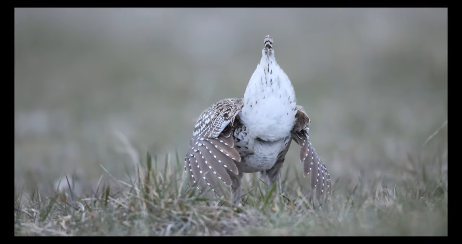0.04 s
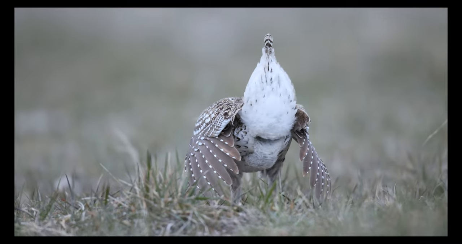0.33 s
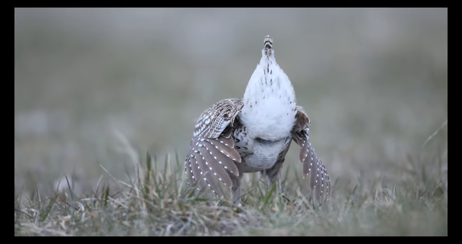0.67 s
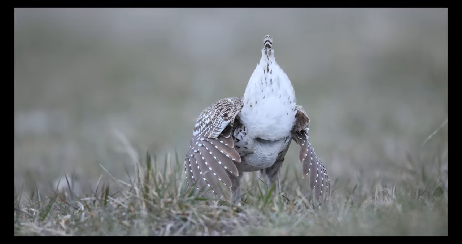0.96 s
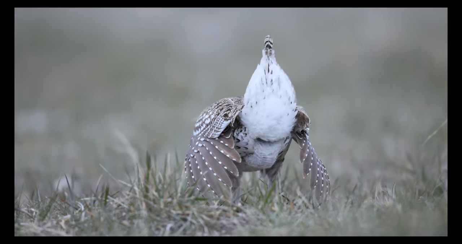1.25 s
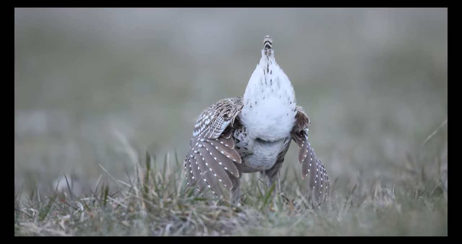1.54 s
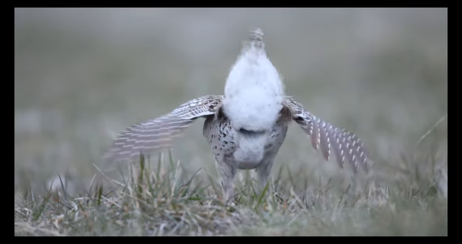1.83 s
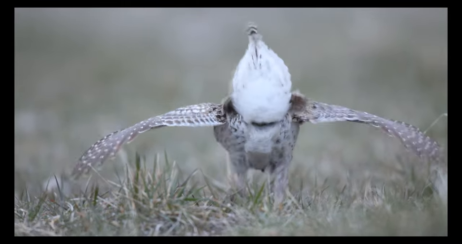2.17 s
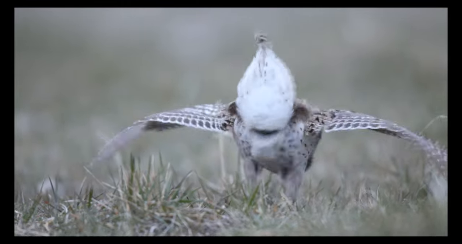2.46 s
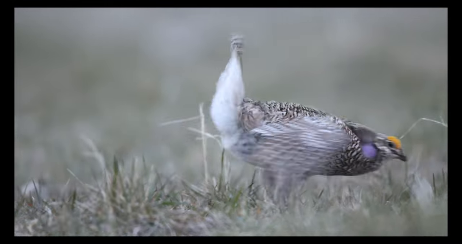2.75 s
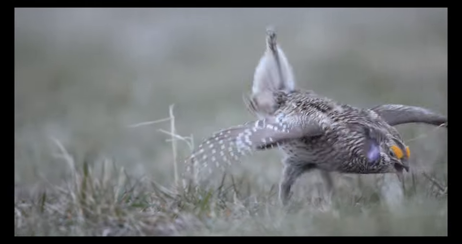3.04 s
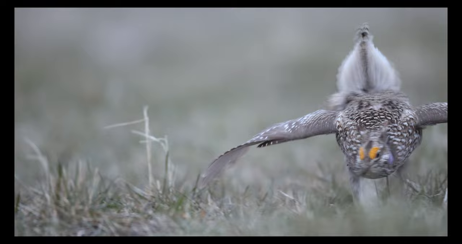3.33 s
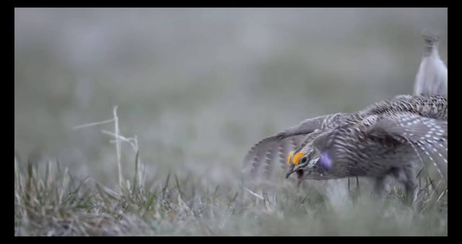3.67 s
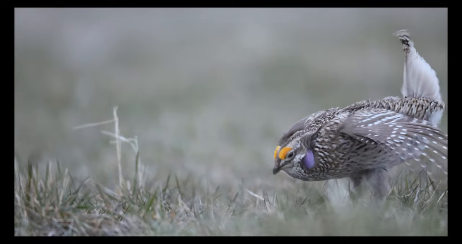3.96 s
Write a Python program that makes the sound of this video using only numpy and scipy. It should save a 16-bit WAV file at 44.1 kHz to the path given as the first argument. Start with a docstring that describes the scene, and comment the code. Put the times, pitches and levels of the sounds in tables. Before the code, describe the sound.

A grouse stamps its feet in a rapid drumming roll, with rattling tail clicks and squeaks.

```python
"""A grouse dancing on short grass

Close by, a grouse stamps about twenty times a second. Each stamp is a knock and a dull thump in the turf.
At full dance its tail swishes and the quills click with the steps. Stiff feathers snap in between,
the grouse pop their neck sacs and squeak, others patter nearby and small birds whistle far off."""
import sys
import numpy as np
from scipy import signal
from scipy.fft import rfft, irfft
from scipy.io import wavfile

SR = 44100
rng = np.random.default_rng(int(sys.argv[2]) if len(sys.argv) > 2 else 0)


def output_pcm(signal):
    """Save a mono or channel-first signal as 16-bit PCM at the path in sys.argv[1].

    Samples are clipped to [-1, 1] before scaling.
    """
    pcm = np.clip(np.atleast_2d(signal).T, -1, 1) * 32767
    wavfile.write(sys.argv[1], SR, np.round(pcm).astype(np.int16))


N = 176400
TIME = np.arange(N) / SR
BRIEF = np.arange(int(.06 * SR)) / SR   # the clock for one short sound, in seconds

# Levels in the tables are relative: the functions may turn a whole layer up or down.
# The tone of still morning air. Each row: frequency in Hz, level in dB.
AIR_TONE = [(25, -12), (90, 3), (177, -3), (432, -7.5), (700, -13), (1230, -16), (15500, -25.5)]
# The part of the air that differs between the ears. Each row: frequency in Hz, level in dB.
SIDE_AIR_TONE = [(25, 11), (900, -23), (16000, -20.5)]
# Far songbirds. Each row: start and length in seconds, first, middle and last pitch in Hz, level in dB.
WHISTLES = [(0.683, 0.25, 4240, 3810, 3340, -61), (0.814, 0.21, 2774, 2744, 2714, -60),
            (1.162, .17, 3330, 3150, 3160, -61.5), (1.253, 0.088, 2350, 2244, 2210, -52),
            (1.639, 0.096, 2188, 2228, 2196, -46.5), (1.799, 0.051, 2533, 2555, 2620, -49.5),
            (3.175, 0.094, 3620, 3640, 3640, -46), (3.384, 0.23, 2020, 2020, 1980, -48.5)]
# The other grouse moving about. Each row: time in seconds, then patter, scuff and rustle levels in dB.
BUSTLE_LEVELS = [(0, -46, -49.5, -65), (.4, -53, -72.5, -75), (.6, -67, -89, -97), (1.15, -78, -72, -84),
                 (1.48, -56, -58.5, -67), (1.6, -39.5, -57, -64.5), (1.76, -40, -63, -64),
                 (1.95, -38, -50.5, -56.5), (2.12, -37.5, -40.5, -50.5), (2.43, -27, -37.5, -47.5),
                 (3.02, -30.5, -35.5, -47.5), (3.6, -29.5, -44, -47.5), (4, -38.5, -33.5, -52.5)]
# The tone of scuffed grass. Each row: frequency in Hz, level in dB.
SCUFF_TONE = [(52, -47), (82, 7), (130, 2.5), (350, 7.5), (550, 1.5), (780, -5), (1050, -19), (1600, -20.5)]
# The tone of rustling feathers. Each row: frequency in Hz, level in dB.
RUSTLE_TONE = [(1600, -12), (2300, 3.5), (3600, 4.5), (4600, 0), (7000, -4.5), (10000, -10), (16000, -16.5)]
# Hollow pops from the neck sacs. Each row: start in seconds, level in dB.
POPS = [(2.486, -20), (2.957, -20.5), (3.491, -20.5), (3.757, -36.5), (3.797, -37.5)]
# Squeaks and yelps. Each row: start and length in seconds, first, middle and last pitch in Hz,
# level in dB, rough drop from one overtone to the next in dB.
SQUEAKS = [(-.012, 0.022, 1011, 846, 644, -27.5, 10.5), (0, 0.087, 1910, 2167, 1500, -36, 24),
           (0.007, 0.073, 638, 431.4, 410, -39.5, 7.5), (1.982, 0.035, 2500, 2744, 2470, -40, 14),
           (1.974, 0.053, 2000, 2140, 2120, -44.5, 30), (2.049, 0.012, 820, 1074, 1300, -30.5, 9.5),
           (2.059, 0.017, 1980, 2173, 2220, -20, 29), (2.067, 0.023, 2810, 2800, 2350, -22.5, 21.5),
           (2.09, 0.0186, 1680, 1360, 1190, -30, 23), (2.367, 0.065, 2380, 1370, 1120, -51, 12),
           (2.382, 0.065, 3400, 3160, 2970, -45, 6), (2.557, 0.036, 2800, 2680, 2460, -42.5, 5),
           (1.442, 0.031, 2850, 2350, 1650, -55.5, 30), (2.014, .032, 1910, 1247, 990, -46, 16),
           (3.749, 0.04, 3210, 3220, 3080, -39, 4), (3.79, 0.042, 3120, 2780, 2630, -37.5, 31),
           (3.834, 0.017, 694, 1306, 1900, -29.5, 16), (3.848, 0.035, 2620, 2888, 2600, -19.5, 7),
           (3.884, .032, 1305, 1216, 940, -25, 23), (3.894, 0.029, 2590, 2630, 2500, -42, 4),
           (3.968, 0.03, 2910, 3160, 2850, -40.5, 7)]
# Stiff feathers snapping; the first three rows, on the opening steps, are the high ring of the quills as the
# tail clicks. Each row: time in seconds, level in dB, pitch in Hz.
SNAPS = [(0.111, -49, 5250), (0.217, -49.5, 5100), (0.323, -50, 5200), (2.392, -27, 7500),
         (2.4038, -18.5, 3610), (2.47, -20, 3220), (2.469, -29, 7480), (2.878, -25, 3520),
         (2.943, -27.5, 3375), (2.943, -30, 7730), (3.073, -33, 6670), (3.395, -27, 7810),
         (3.409, -34.5, 3840), (3.473, -28, 7900), (3.475, -31.5, 3585), (3.702, -32.5, 6520),
         (3.781, -34, 6230)]
# How hard the bird dances. Each row: time in seconds, level in dB.
VIGOUR = [(0, -21), (.35, -23), (.5, -41), (1.3, -30.5), (1.85, -34), (2.09, -11.5), (2.19, 0.5),
          (2.35, -5.5), (3.65, -3), (3.8, 1.5), (4, -16.5)]
# The tone of the tail's swish. Each row: frequency in Hz, level in dB.
SWISH_TONE = [(1500, -30), (2300, -1.5), (3600, 3), (4400, -1), (8500, -1), (11000, -6), (16000, -17)]
# The dancer's steps. Each row: time in seconds, thump level in dB, tail click level in dB.
STAMPS = [(0.058, -30.5, -58), (0.11, -28.5, -49.5), (0.164, -32, -75), (0.216, -33, -52),
          (0.266, -30.5, -69), (0.322, -31.5, -53.0), (0.364, -35, -62.8), (0.417, -36, -72.8),
          (1.226, -40.5, -67), (1.275, -40, -75), (1.323, -38.5, -69), (1.378, -42.5, -83),
          (1.428, -39.5, -57), (1.478, -38.5, -57), (1.53, -34, -57), (1.598, -31, -62), (1.652, -32, -61),
          (1.742, -27.5, -58), (1.818, -34, -55), (1.9, -26, -45), (1.949, -25, -49), (2, -26.5, -45),
          (2.048, -24.5, -41), (2.097, -19, -36), (2.144, -18, -24), (2.195, -17, -24.5),
          (2.244, -16.5, -22.5), (2.293, -16, -25), (2.343, -15, -21), (2.378, -18.0, -33.5),
          (2.416, -19, -55), (2.45, -18, -51), (2.514, -16, -28), (2.564, -16, -29.5),
          (2.615, -18.5, -23.5), (2.664, -15.5, -29.5), (2.716, -18, -27), (2.766, -16.5, -29.5),
          (2.815, -18, -29.5), (2.852, -16, -36), (2.886, -21.5, -60.7), (2.92, -17.7, -55),
          (2.987, -16.5, -39), (3.039, -16.5, -27.5), (3.09, -18, -31.5), (3.142, -15, -28),
          (3.192, -18.5, -30), (3.244, -18.5, -26), (3.297, -19, -29.5), (3.346, -15.5, -26),
          (3.382, -19, -37), (3.417, -22.5, -51), (3.45, -20, -46), (3.516, -20.5, -37), (3.57, -19, -32.5),
          (3.622, -18.7, -29.5), (3.671, -21, -31.5), (3.725, -20.5, -33), (3.926, -20.5, -41),
          (3.991, -24, -41)]


def from_db(db):
    """Turn decibels into a number to multiply a sound by."""
    return 10 ** (np.asarray(db) / 20)


def rms_one(x):
    """Scale a sound so that its average power is 1."""
    return x / np.sqrt(np.mean(x ** 2) + 1e-20)


def gains(rows):
    """Turn each dB column of a table into a volume for every sample."""
    times, *columns = np.transpose(rows)
    return [from_db(np.interp(TIME, times, column)) for column in columns]


def add(out, start_s, sound):
    """Mix a sound in at a given time, dropping what does not fit."""
    i = int(round(start_s * SR))
    part = sound[max(-i, 0):max(N - i, 0)]
    out[max(i, 0):max(i, 0) + len(part)] += part


def noise(tone):
    """Steady noise shaped by a tone table."""
    hz, db = np.transpose(tone)
    all_hz = np.arange(N // 2 + 1) * SR / N
    curve_db = np.interp(np.log(all_hz + 1), np.log(hz), db, left=-60, right=-60)
    return rms_one(irfft(rfft(rng.standard_normal(N)) * from_db(curve_db), N))


def wander(t, rate_hz):
    """A random wobble, mostly between -1 and 1."""
    return np.interp(t * rate_hz, np.arange(4096), rng.standard_normal(4096))


def phase_of(hz):
    """The angle a wave has turned through as it follows a changing pitch."""
    return 2 * np.pi * np.cumsum(hz) / SR


def bump(t, width_s):
    """A smooth hill that peaks where t is zero."""
    return np.exp(-.5 * (t / width_s) ** 2)


def swell(rise_s, shape):
    """A volume that rises, then dies away; a larger shape makes it shorter."""
    u = BRIEF / rise_s
    return (u * np.exp(1 - u)) ** shape


def thud(hz, rise_s, shape):
    """A few swings of a tone that quickly dies away."""
    return swell(rise_s, shape) * np.sin(2 * np.pi * hz * BRIEF)


def grit(low_hz, high_hz):
    """A short piece of bright rubbing noise."""
    hiss = rng.standard_normal(len(BRIEF))
    bright = signal.sosfilt(signal.butter(2, low_hz, "high", fs=SR, output="sos"), hiss)
    return rms_one(signal.sosfilt(signal.butter(2, high_hz, fs=SR, output="sos"), bright))


def note(length_s, pitches, rough, shape, drop_db=0, harmonics=1):
    """A bird note that curves through three pitches, with overtones if asked for."""
    t = np.arange(int(length_s * SR)) / SR
    progress = t / length_s
    hz = np.polyval(np.polyfit([0, .5, 1], pitches, 2), progress)
    phase = phase_of(hz * (1 + rough * wander(t, 857)))
    wave = sum(from_db(-drop_db * k - k * (k - 1.5)) * np.sin((k + 1) * phase) for k in range(harmonics))
    return np.sin(np.pi * progress) ** shape * wave


def vigour_db(s):
    """How hard the bird is dancing at a given second."""
    return np.interp(s, *np.transpose(VIGOUR))


def air():
    """Faint morning air: the part both ears share, and the part that differs."""
    side = from_db(-67.5) * noise(SIDE_AIR_TONE)
    return from_db(-60) * noise(AIR_TONE), side


def meadow_echo(calls, echo_db=-25.5, fade_s=0.17):
    """The meadow scatters a little sound back, leaving a faint echo behind each call."""
    t = TIME[:SR // 2]
    scatter = rng.standard_normal(len(t)) * from_db(-60 * t / fade_s)
    echo = signal.fftconvolve(calls, scatter / np.linalg.norm(scatter))[:N]
    return calls + from_db(echo_db) * echo


def songbirds(trill_start_s=1.402, trill_step_s=.079, trill_hz=(4700, 4050, 3550)):
    """Small far birds sing pure whistles and a thin trill of seven falling notes."""
    out = np.zeros(N)
    for s, length_s, *pitches, db in WHISTLES:
        add(out, s, from_db(db) * note(length_s, pitches, rough=0.0065, shape=0.37))
    for k in range(7):
        falling = note(.052, trill_hz, rough=0.035, shape=1)
        add(out, trill_start_s + k * trill_step_s, from_db(-61) * falling)
    return out


def bustle(steps_per_s=110, low_hz=145.5, high_hz=277, range_db=8):
    """Other grouse patter about at random, scuffing the grass and rustling their feathers."""
    patter_gain, scuff_gain, rustle_gain = gains(BUSTLE_LEVELS)
    scuff = noise(SCUFF_TONE) * from_db(4.76 * wander(TIME, 90))
    rustle = noise(RUSTLE_TONE) * from_db(4 * wander(TIME, 601) + 2 * wander(TIME, 45))
    patter = np.zeros(N)
    for k, (delay, pitch, size) in enumerate(rng.random((int(steps_per_s * N / SR), 3))):
        step = thud(low_hz + (high_hz - low_hz) * pitch, rise_s=0.0048, shape=1.05)
        add(patter, (k + delay) / steps_per_s, from_db(range_db * size) * step)
    patter = from_db(-2.5) * patter_gain * rms_one(patter)
    return patter + scuff_gain * rms_one(scuff) + rustle_gain * rms_one(rustle)


def bustle_dips(lead_s=0.016, dip_db=-2):
    """A volume that makes the bustle a little quieter just before each stamp."""
    return from_db(dip_db * sum(bump(TIME - s + lead_s, width_s=0.0045) for s, *_ in STAMPS))


def pops(start_hz=325, ring_hz=844, glide_s=0.0085):
    """Each pop slides up to the pitch at which the neck sacs ring."""
    out = np.zeros(N)
    phase = phase_of(ring_hz + (start_hz - ring_hz) * np.exp(-BRIEF / glide_s))
    for s, db in POPS:
        add(out, s, from_db(db) * swell(rise_s=0.0083, shape=1.14) * np.sin(phase))
    return out


def squeaks(rasp_hz=28):
    """The grouse squeak and yelp, their voices breaking from one pitch range to another."""
    out = np.zeros(N)
    for s, length_s, *pitches, db, drop_db in SQUEAKS:
        squeak = note(length_s, pitches, rough=rasp_hz / pitches[1], shape=0.79, drop_db=drop_db, harmonics=5)
        add(out, s, from_db(db) * squeak)
    return out


def wings(start_s=1.735):
    """The opening wings push a soft, low puff of air."""
    out = np.zeros(N)
    add(out, start_s, from_db(-33.5) * thud(hz=121.3, rise_s=.013, shape=2.2))
    return out


def feather_snaps(width_s=0.00076, fade_s=0.0036):
    """A stiff feather lets go, or a quill rings high as the tail clicks: a tiny ping and a dry crackle."""
    out, middle = np.zeros(N), BRIEF.mean()
    for s, db, hz in SNAPS:
        phase = phase_of(hz * (1 + 0.076 * wander(BRIEF, 2453)))
        ping = np.sin(phase) * bump(BRIEF - middle, width_s)
        crackle = grit(2500, 10000) * np.exp(-BRIEF / fade_s)
        add(out, s - middle, from_db(db + 3) * ping)
        add(out, s - width_s, from_db(db - 9.5) * crackle)
    return out


def quill_clicks(base_hz=2892, width_s=.0013, pitch_split=.12, lag_s=.0006):
    """The quills of the tail's two halves catch in rough, rising chirps, a little apart in pitch and time."""
    out, middle = np.zeros(N), BRIEF.mean()
    t = BRIEF - middle
    rise = 0.27 * np.tanh(70 * t)
    for s, _, db in STAMPS:
        hz = base_hz * (1 + 0.013 * vigour_db(s) + 0.0408 * rng.standard_normal())   # lazy tails click lower
        for half in (-1, 1):
            phase = phase_of(hz * (1 + half * pitch_split + rise + 0.076 * wander(BRIEF, 1995)))
            chirp = np.sin(phase) + from_db(-10) * np.sin(2 * phase) + from_db(-14) * grit(3400, 5700)
            click = chirp / np.cosh(t / width_s)   # only the middle of the chirp is heard
            add(out, s - middle + half * lag_s, from_db(db - 2) * click)
    return out


def tail_swish(lead_s=0.0067):
    """The tail feathers slide past each other just before the quills click."""
    sweeps, middle = np.zeros(N), BRIEF.mean()
    for s, *_ in STAMPS:
        add(sweeps, s - lead_s - middle, bump(BRIEF - middle, width_s=0.005))
    level_db = -42 + vigour_db(TIME) + 1.7 * wander(TIME, 700)
    return from_db(level_db) * sweeps * noise(SWISH_TONE)


def feet(thump_hz=204, knock_hz=641, lead_s=0.00723, knock_rise_s=.002):
    """Each foot lands with a short knock, then the turf thumps. Harder dancing brings out the knock."""
    out = np.zeros(N)
    for s, db, _ in STAMPS:
        landing_s = s - lead_s
        thump = thud(thump_hz * (1 + 0.038 * rng.standard_normal()), rise_s=0.88 * lead_s, shape=2.61)
        knock = thud(knock_hz * (1 + .1 * rng.standard_normal()), knock_rise_s, shape=2.3)
        add(out, landing_s, from_db(db - 1) * thump)
        add(out, landing_s - knock_rise_s / 2, from_db(db - 7 + .5 * vigour_db(s)) * knock)
    return signal.sosfilt(signal.butter(6, 1050, fs=SR, output="sos"), out)   # keep the stamps dull


def scene():
    """All the birds sit in the centre; only the faint air differs between the ears."""
    shared_air, side_air = air()
    dancer = feet() + wings() + quill_clicks() + tail_swish() + feather_snaps()
    calls = meadow_echo(pops() + squeaks() + songbirds())
    centre = shared_air + dancer + calls + bustle() * bustle_dips()
    return np.array([centre + side_air, centre - side_air])


def record(dry, low_hz=50, high_hz=15900):
    """The microphone loses the deep bass, and the highest treble is cut off sharply."""
    less_bass = signal.sosfilt(signal.butter(2, low_hz, "high", fs=SR, output="sos"), dry)
    return signal.sosfilt(signal.ellip(10, .1, 80, high_hz, fs=SR, output="sos"), less_bass)


dry = scene()
out = record(dry)
output_pcm(out)
```